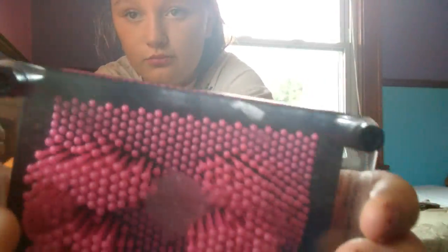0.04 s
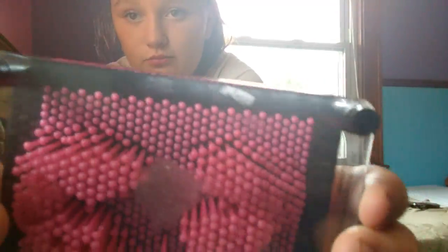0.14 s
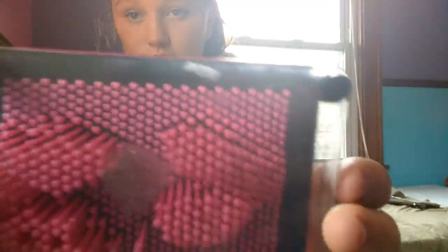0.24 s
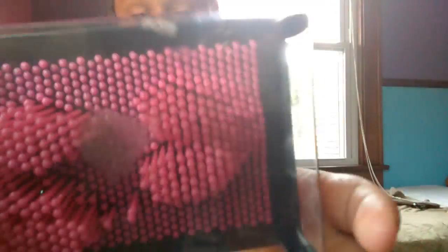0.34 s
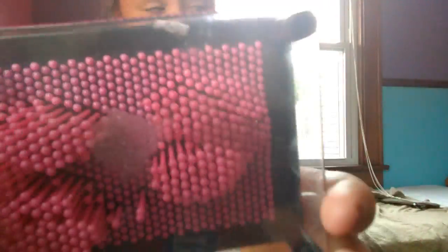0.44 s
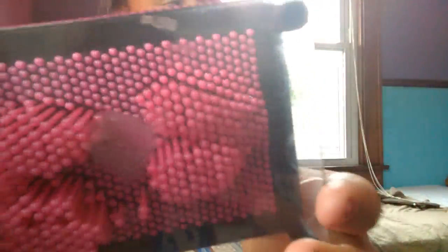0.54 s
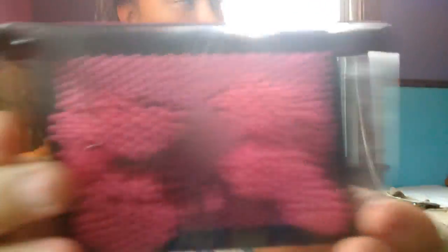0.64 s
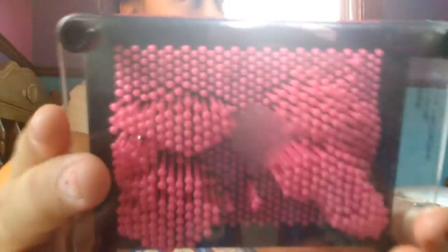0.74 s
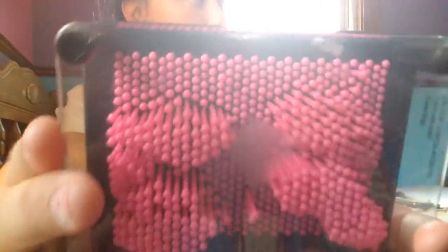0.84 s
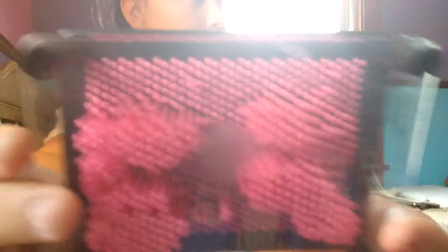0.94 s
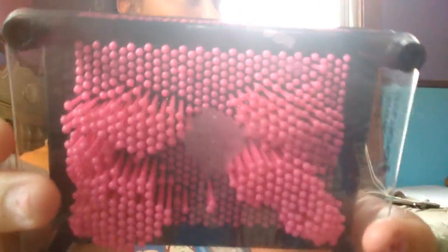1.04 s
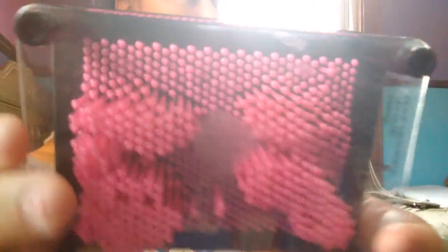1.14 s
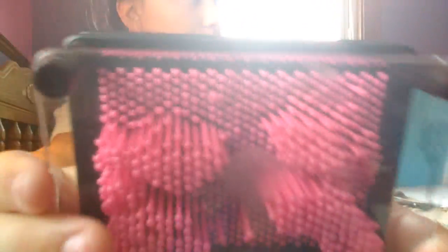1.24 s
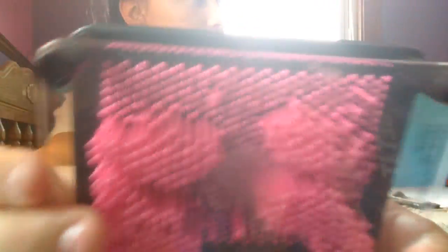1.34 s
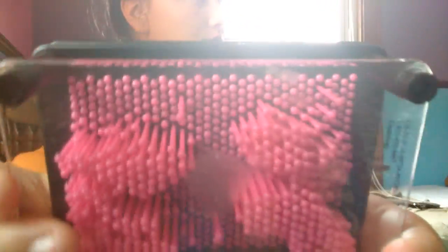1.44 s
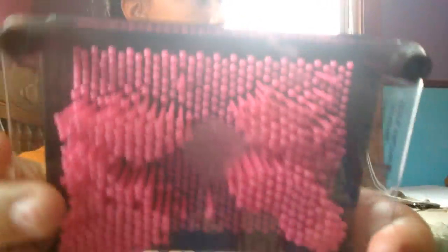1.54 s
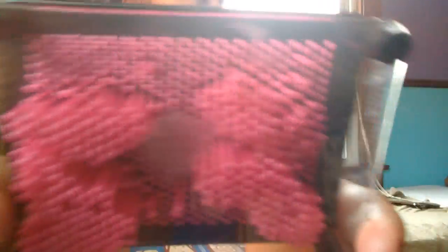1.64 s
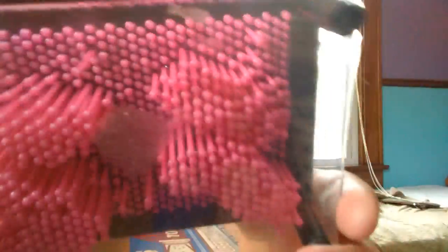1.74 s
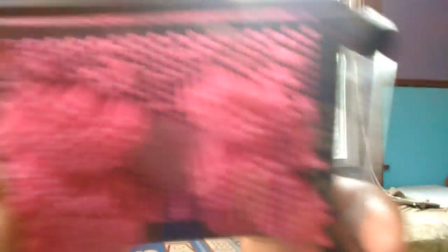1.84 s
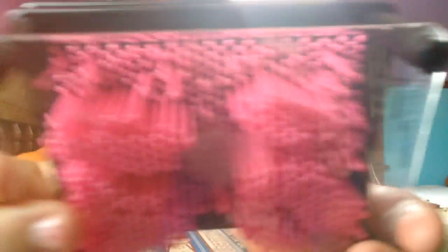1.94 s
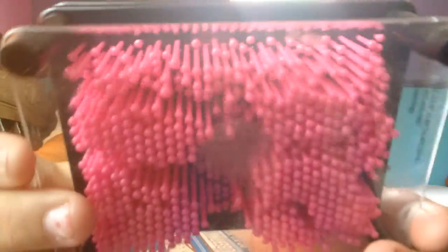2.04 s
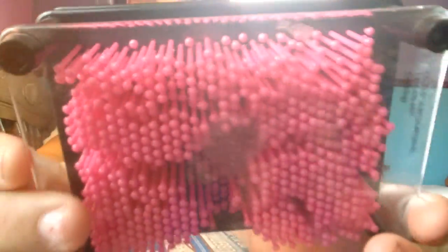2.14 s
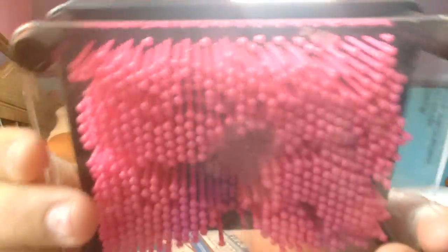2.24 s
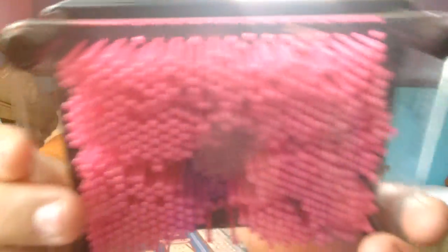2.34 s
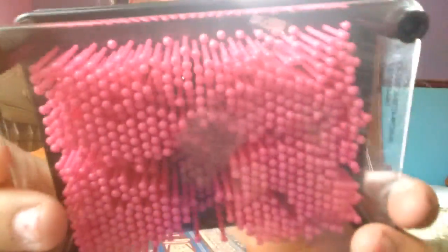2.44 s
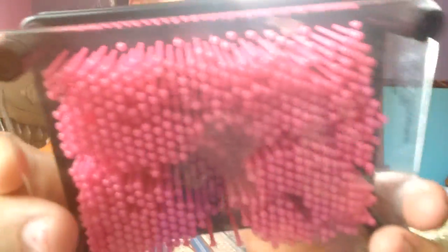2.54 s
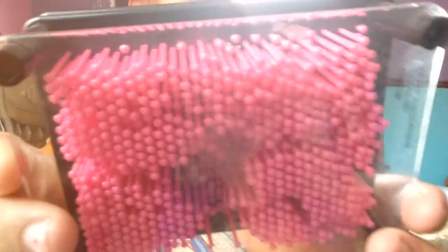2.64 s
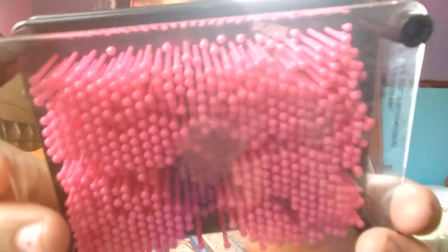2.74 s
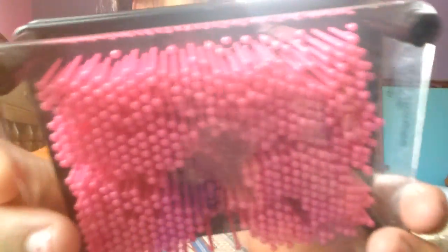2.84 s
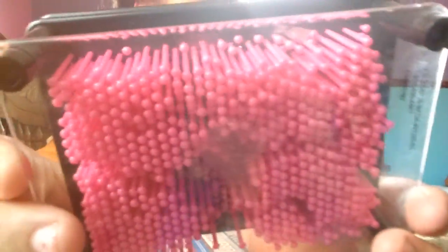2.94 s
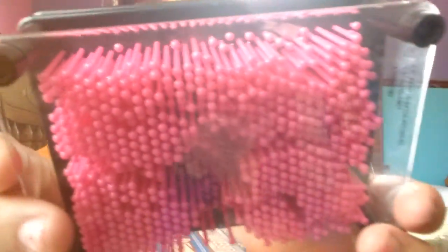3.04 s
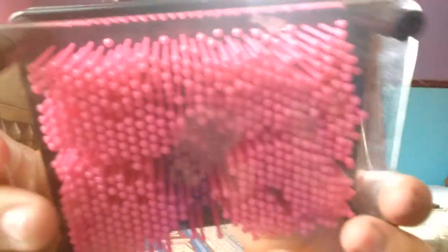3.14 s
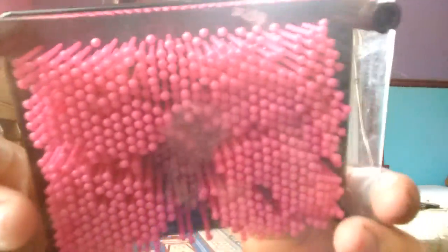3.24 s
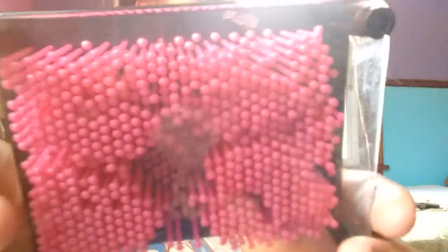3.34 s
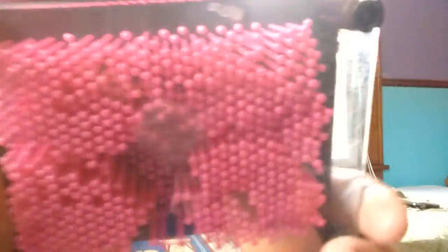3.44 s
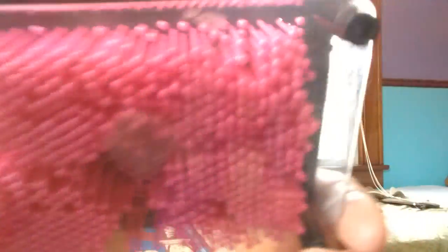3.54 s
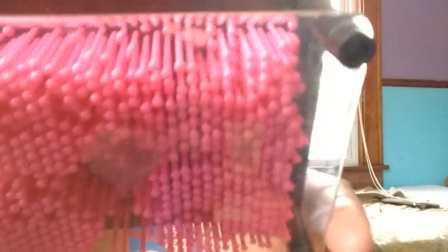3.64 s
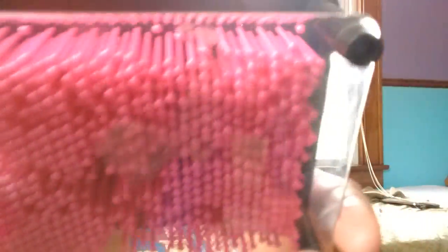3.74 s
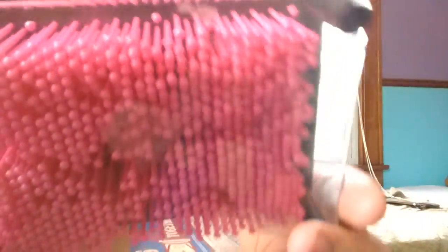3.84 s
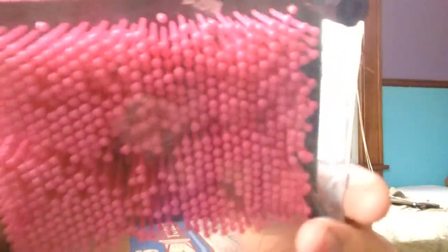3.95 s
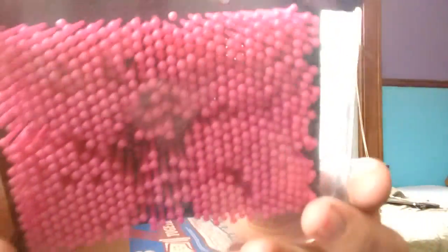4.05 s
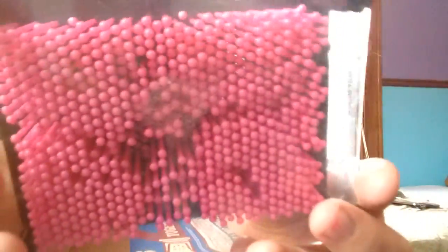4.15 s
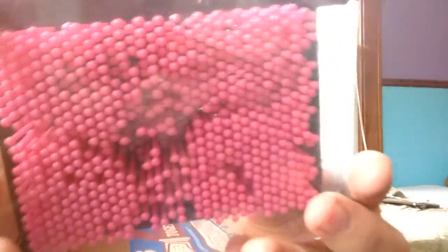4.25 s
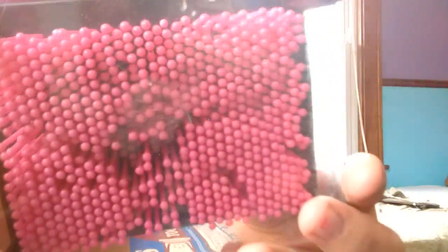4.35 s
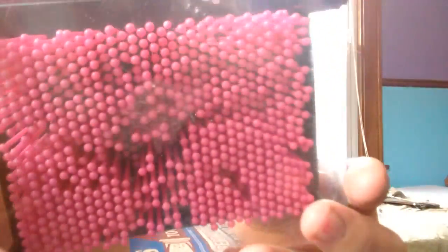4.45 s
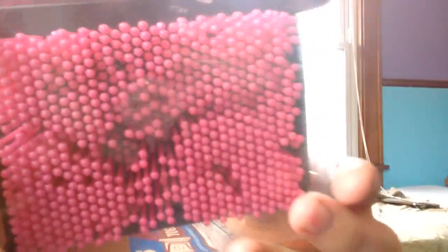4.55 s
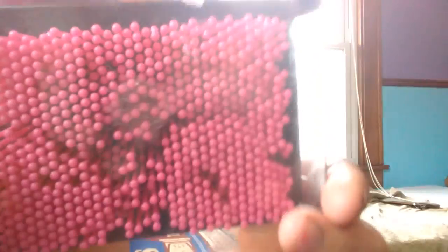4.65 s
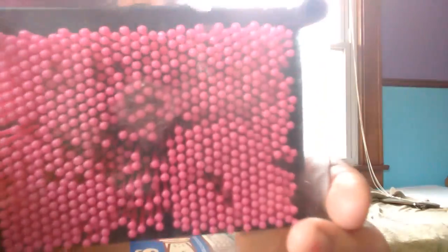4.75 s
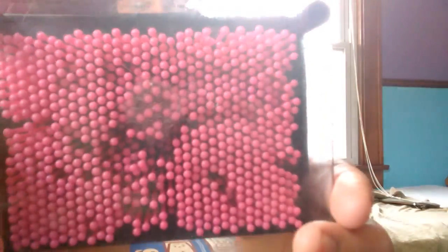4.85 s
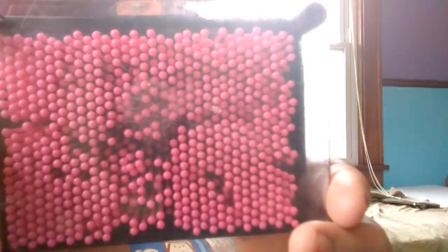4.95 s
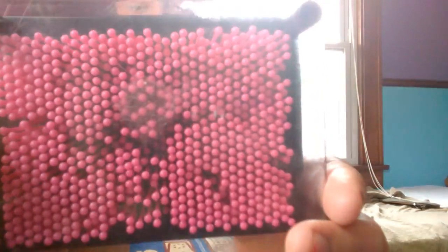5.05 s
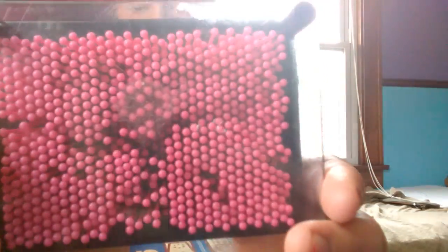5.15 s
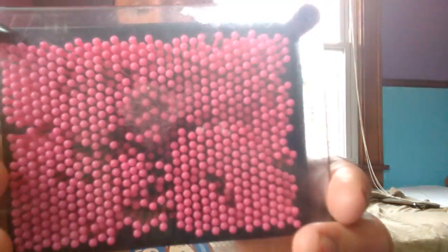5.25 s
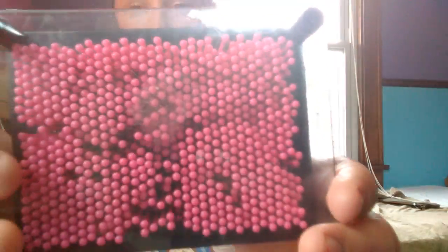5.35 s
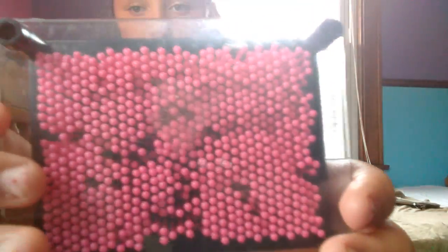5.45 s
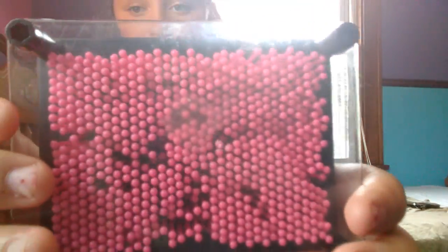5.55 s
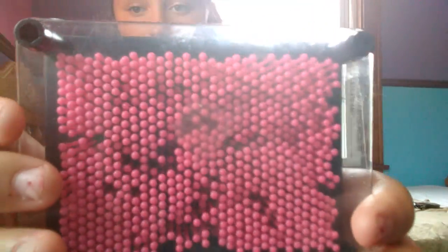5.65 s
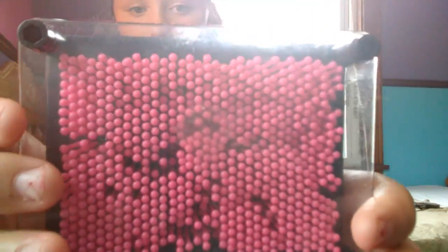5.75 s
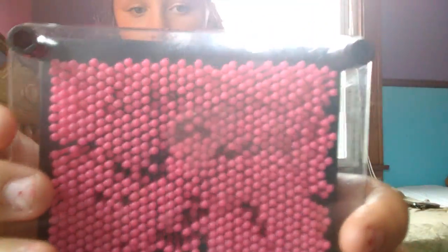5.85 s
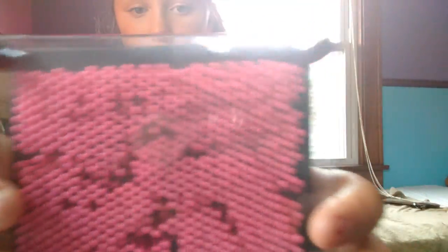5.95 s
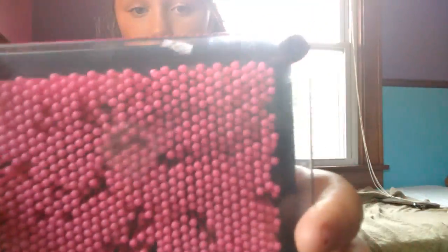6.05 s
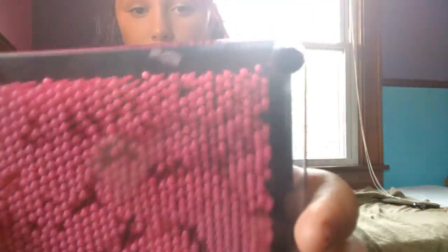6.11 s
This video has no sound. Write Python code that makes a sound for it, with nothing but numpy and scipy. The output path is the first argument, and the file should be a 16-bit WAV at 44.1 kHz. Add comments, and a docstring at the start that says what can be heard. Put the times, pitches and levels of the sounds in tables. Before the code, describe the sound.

Plastic pins in a pin art toy rustle and fall in irregular bursts of bright clicks as it is tilted in a small room.

```python
"""A small room, close up on a pin art toy: hundreds of loose plastic pins in a frame, tilted and pressed.
Pins drop one by one or land in whole patches against the clear front plate; between the falls they
rustle in their holes. Each hit is a bright pin ring near 8 kHz over a duller knock from the frame.
Fingers tap and rub the plate, hands rumble softly on the case, and faint room tone sits underneath."""
import sys
import numpy as np
from scipy import signal
from scipy.fft import rfft, irfft
from scipy.io import wavfile

SR = 44100
rng = np.random.default_rng(int(sys.argv[2]) if len(sys.argv) > 2 else 0)


def wav_out(sig):
    """Save sig, one row per channel (or a flat mono array), as 16-bit PCM at SR to the path in sys.argv[1]."""
    wavfile.write(sys.argv[1], SR, np.round(np.clip(np.atleast_2d(sig).T, -1, 1) * 32767).astype(np.int16))


N = 272538
TIME = np.arange(N) / SR

# Cue levels come before each layer's trim; spectra set tone colour only.
# single pins hitting their stop: t/s, level/dB
PIN_DROPS = [(0.0474, -11.5), (0.0644, -8), (0.9991, -33.5), (1.2961, -51.5), (1.4109, -41), (1.432, -36.5),
             (1.6677, -21.5), (1.8565, -26), (1.9032, -20.5), (1.945, -11.5), (2.0156, -3), (2.0335, -2),
             (2.0656, -8.5), (2.0715, -4), (2.1102, -5.5), (2.123, -2.5), (2.1603, -6), (2.381, -23),
             (2.421, -13), (2.467, -8.5), (2.8603, -19), (2.8918, -21.5), (2.918, -26.5), (3.1991, -34),
             (3.271, -32.5), (3.6599, -46), (3.6929, -33), (3.7108, -33.5), (3.746, -20.5), (3.7707, -13),
             (3.7831, -5), (3.8111, -2.5), (3.8842, -19.5), (3.892, -10), (3.933, -11), (3.9522, -19),
             (4.044, -28.5), (4.2035, -26.5), (5.7079, -33)]
# runs of stragglers behind the big falls: t/s, length/s, starting level/dB
STRAGGLER_RUNS = [(2.0092, 0.019, -6.5), (2.054, .035, -8.5), (2.154, 0.028, -5.5), (3.864, 0.017, -9.5)]
STRAGGLER_GAP_S, STRAGGLER_FADE_DB = .009, 8  # mean time between pins; fade over a whole run
# patches of pins landing together: t/s, length/s, level/dB
PATCH_FALLS = [(0.070, 0.015, -7), (0.701, 0.012, -4.5), (1.463, 0.012, -14.5), (1.988, 0.017, -7),
               (2.035, .013, -9), (2.127, .020, -9.5), (3.795, 0.01, -14.5), (3.82, 0.023, -13.5),
               (3.839, 0.022, -13.5), (4.136, 0.022, -22), (5.185, 0.023, -46), (5.533, .021, -37),
               (5.787, 0.014, -41.5), (6.041, 0.017, -16.5)]
# pins sliding as the toy tilts: t/s of fastest motion, length/s, level/dB
PIN_SLIDES = [(0.012, 0.18, -39.5), (0.31, 0.15, -48.5), (0.43, 0.052, -53), (0.522, 0.11, -44),
              (0.69, 0.077, -28.5), (1.26, 0.11, -62), (1.66, 0.17, -38), (1.925, 0.066, -40.5),
              (1.965, 0.081, -38), (2.44, 0.13, -42.5), (2.58, 0.055, -43.5), (3.31, 0.26, -55),
              (3.72, 0.26, -57), (4.24, 0.062, -36.5), (4.565, 0.067, -40.5), (4.69, 0.18, -61),
              (4.76, 0.042, -54.5), (4.868, .05, -54), (5.46, 0.16, -63), (5.58, 0.17, -51),
              (5.72, 0.13, -56), (5.81, .08, -44), (5.96, 0.076, -53.5), (6.025, 0.076, -46.5)]
# fingertips tapping the front plate: t/s, level/dB
FINGER_TAPS = [(0.364, -54), (0.5878, -51.5), (0.875, -58.5), (2.3085, -47), (2.3308, -41), (3.6857, -57),
               (3.711, -51.5), (5.195, -47), (5.487, -58), (5.537, -41), (5.552, -40.5), (5.6374, -51),
               (6.049, -31)]
# fingers dragging over the plate: t/s of firmest pressure, length/s, level/dB
FINGER_DRAGS = [(0.25, 0.7, -63), (1.66, 0.28, -60), (2.16, 0.16, -50.5), (2.52, .25, -66.5),
                (4.23, 0.29, -64.5), (5.33, 0.19, -78.5), (5.6, 0.66, -69), (6.1, 0.42, -65)]
# envelope of the hands shifting on the case: t/s, level/dB
GRIP_ENVELOPE = [(0.0, -63.5), (0.55, -65.5), (1.12, -87), (2.17, -65.5), (2.75, -76.5), (4.15, -71.5),
                 (4.99, -79.5), (6.18, -70.5)]
# low thuds under the heavy falls: t/s, level/dB
LOW_THUDS = [(0.078, -56.5), (0.704, -36.5), (1.995, -59)]
THUD_START_HZ, THUD_END_HZ, THUD_SWEEP_S, THUD_T60_S = 240, 45, 0.0076, 0.071

# spectra of a pin, the frame, the tapped plate, the rubbed plate, the grip and room tone: f/Hz, level/dB
PIN_TONE = [(1000, -41.5), (4000, -19.5), (6500, 2), (9500, 2), (12500, -8), (16000, -14)]
FRAME_TONE = [(60, -26), (250, -15.5), (500, -10), (1200, -9.5), (2000, -2.5), (3200, 2), (5500, 3),
              (9000, -20.5), (16000, -31)]
TAP_TONE = [(100, -14.5), (500, -9), (1500, -1), (3000, -0.5), (6000, -5.5), (16000, -31)]
DRAG_TONE = [(100, -10.5), (350, -1), (700, -6), (1100, -16), (3000, -16.5), (6000, -27.5), (16000, -47.5)]
GRIP_TONE = [(25, -15), (60, 0), (130, 2), (300, -4.5), (550, -9.5), (1000, -17.5), (3000, -25.5),
             (16000, -45)]
ROOM_TONE = [(15, -27.5), (25, -14.5), (53, -18), (123, -15), (1330, -41.5), (4370, -38.5), (6380, -40.5),
             (8360, -24), (9840, -37.5), (16000, -51)]
# resonances of a pin, the frame and the plate: f/Hz, width/Hz, boost/dB
PIN_MODES = [(7490, 400, 6), (8160, 622, 17.5), (8755, 450, 11), (9800, 200, 5.5), (11060, 240, 10),
             (14100, 430, 4)]
FRAME_MODES = [(560, 170, 2.1), (845, 250, 3), (1770, 240, 2.6), (2290, 110, 3), (3070, 180, 2.2),
               (5120, 220, 3)]
PLATE_MODES = [(520, 90, 7), (1110, 90, 4.5), (1630, 69, 10.5), (2140, 90, 5.5), (2840, 230, 8)]
FRAME_FOLLOWS = 0.87  # dB of frame knock per dB of pin ring: soft hits are duller

# reverb decay of the room: f/Hz, t60/s
ROOM_T60 = [(100, .5), (600, 0.5), (2000, 0.3257), (8000, 0.286), (16000, 0.31)]
# early reflections off desk and walls: delay/s, level/dB
REFLECTIONS = [(.0092, -22.5), (0.0125, -22.5), (.023, -23.5)]


def single_pins(frame, pin_db=11.5, frame_db=-3.0):
    """Sharp clicks: each falling pin rings and knocks the frame."""
    out = np.zeros(N)
    for s, level_db in list(PIN_DROPS) + stragglers():
        ring = strike(pin_ring(), chatter_t60=0.014, chatter_db=11.5)
        knock = strike(frame, chatter_t60=0.015, chatter_db=1.5)
        add(out, s, from_db(level_db + pin_db) * ring)
        add(out, s, from_db(FRAME_FOLLOWS * level_db + frame_db) * knock)
    return out


def pin_ring(spread=.018):
    """One pin's impulse response; no two ring at quite the same pitch."""
    return response(PIN_TONE, PIN_MODES, detune=1 + spread * rng.standard_normal())


def stragglers(count=16):
    """Late pins drop unevenly, softer as each run goes on. Returns cues: t/s, level/dB."""
    cues = []
    for start, length, level_db in STRAGGLER_RUNS:
        gaps = STRAGGLER_GAP_S * rng.uniform(.5, 1.5, count)
        ages = np.cumsum(gaps) - gaps[0]
        levels = level_db - STRAGGLER_FADE_DB * ages / length + 2 * rng.standard_normal(count)
        cues += [(start + age, db) for age, db in zip(ages, levels) if age < length]
    return cues


def pin_patches(frame, pin_db=-5.0, frame_db=-20.0, count=4):
    """A short crunch: dozens of pins land almost at once, loudest in the middle."""
    out = np.zeros(N)
    for s, length, level_db in PATCH_FALLS:
        size = int(length * SR)
        swell = np.sqrt(np.hanning(size))
        forces = [swell * grains(SR // 20, per_s=1500, spread_db=4.5)[:size] for _ in range(count)]
        rings = unit_energy(sum(signal.fftconvolve(force, pin_ring()) for force in forces))
        knocks = unit_energy(signal.fftconvolve(sum(forces), frame))
        rings *= from_db(level_db + pin_db)
        knocks *= from_db(FRAME_FOLLOWS * level_db + frame_db)
        add(out, s, np.sqrt(size) * (rings + knocks))
    return out


def sliding_pins(frame, pin_db=-3.0, frame_db=-26.0, ring_band_hz=(6800, 10000), count=4):
    """Rustle: pins catch and slip in their holes, too softly to stir much but their main ring."""
    motion = swells(PIN_SLIDES)
    rings = knocks = 0
    for _ in range(count):
        catches = grains(N, per_s=190, spread_db=11.0)
        tick = unit_energy(contact(chatter_t60=.006, chatter_db=1.5))
        ticks = motion * convolve(catches, tick)
        rings += convolve(ticks, pin_ring())
        knocks += convolve(ticks, frame)
    main_ring = bandpass(rings, ring_band_hz, order=1)
    return (from_db(pin_db) * main_ring + from_db(frame_db) * knocks) / np.sqrt(count)


def fingers(tap_db=17.5):
    """Fingertips stick and slip across the front plate, or tap it; both ring the same modes."""
    slips = swells(FINGER_DRAGS) * grains(N, per_s=700, spread_db=4.0)
    out = convolve(slips, response(DRAG_TONE, PLATE_MODES))
    plate = response(TAP_TONE, PLATE_MODES)
    for s, level_db in FINGER_TAPS:
        add(out, s, from_db(level_db + tap_db) * strike(plate, chatter_t60=.011, chatter_db=1.0))
    return out


def low_end(rub_db=-1.0):
    """Hands rub the case; a low thud sits under the heavy falls, swept quickly downward in pitch."""
    grip_db = np.interp(TIME, *np.transpose(GRIP_ENVELOPE))
    out = from_db(grip_db + rub_db) * convolve(rng.standard_normal(N), response(GRIP_TONE))
    t = np.arange(SR // 2) / SR
    hz = THUD_END_HZ + (THUD_START_HZ - THUD_END_HZ) * np.exp(-t / THUD_SWEEP_S)
    thud = np.sin(2 * np.pi * np.cumsum(hz) / SR) * from_db(-60 * t / THUD_T60_S)
    for s, level_db in LOW_THUDS:
        add(out, s, from_db(level_db) * thud)
    return out


def room_reverb(x, tail_db=-11.0, build_s=0.0042):
    """A few early reflections and a diffuse tail that dies sooner in the treble."""
    t = np.arange(SR // 2) / SR
    edges_hz = np.geomspace(60, 18000, 9)
    tail = 0
    for low, high in zip(edges_hz, edges_hz[1:]):
        band = bandpass(rng.standard_normal(len(t)), (low, high), order=2)
        tail += band * from_db(-60 * t / at_hz(ROOM_T60, np.sqrt(low * high)))
    fade_in = 1 - np.exp(-(t / build_s) ** 2)
    walls = from_db(tail_db) * unit_energy(tail * fade_in)
    for delay, level_db in REFLECTIONS:
        walls[int(delay * SR)] += from_db(level_db)
    return convolve(x, walls)


def room_tone(level_db=-80.5):
    """A faint, steady bed of low rumble and thin hiss."""
    return from_db(level_db) * convolve(rng.standard_normal(N), response(ROOM_TONE))


def contact(chatter_t60, chatter_db, size=600):
    """The force of a hit: a sharp transient, then a few milliseconds of chatter."""
    decay = from_db(-60 * np.arange(size) / SR / chatter_t60)
    force = from_db(chatter_db) * unit_energy(rng.standard_normal(size) * decay)
    force[0] += 1
    return force


def strike(body, chatter_t60, chatter_db):
    """One contact ringing a body, at unit energy."""
    return unit_energy(signal.fftconvolve(contact(chatter_t60, chatter_db), body))


def grains(size, per_s, spread_db):
    """Tiny contacts at random moments, of uneven strength and either sign; mean power 1."""
    strength = from_db(spread_db * np.clip(rng.standard_normal(size), -2, 2))
    sign = rng.choice([-1, 1], size)
    hits = rng.random(size) < per_s / SR
    return unit_energy(strength * sign * hits) * np.sqrt(size)


def swells(moves, rise_share=0.6, depth_db=19):
    """Gain envelope of moves that each build to a peak and die away, evenly in dB."""
    gain = np.zeros(N)
    for s, length, level_db in moves:
        phase = (TIME - s) / length
        from_peak = np.maximum(-phase / rise_share, phase / (1 - rise_share))
        gain += from_db(level_db - depth_db * from_peak)
    return gain


def response(tone, modes=(), detune=1, size=2048):
    """Impulse response of a body with this spectrum and these resonances."""
    hz = np.fft.rfftfreq(size, 1 / SR)
    peaks_db = sum(db / (1 + (2 * (hz - f * detune) / width) ** 2) for f, width, db in modes)
    cepstrum = irfft(np.log(from_db(at_hz(tone, hz) + peaks_db)))
    # fold to minimum phase for a tight attack
    cepstrum[1:size // 2] *= 2
    cepstrum[size // 2 + 1:] = 0
    return unit_energy(irfft(np.exp(rfft(cepstrum))))


def from_db(db):
    """Decibels to gain."""
    return 10 ** (np.asarray(db) / 20)


def unit_energy(x):
    """Scale so that the squares sum to 1."""
    return x / np.sqrt(np.sum(x ** 2) + 1e-20)


def at_hz(points, hz):
    """Read a table on a log-frequency axis."""
    known_hz, values = np.transpose(points)
    return np.interp(np.log(np.maximum(hz, 1)), np.log(known_hz), values)


def add(out, s, sound):
    """Mix a one-shot into out at time s."""
    start = max(int(s * SR), 0)
    out[start:start + len(sound)] += sound[:max(N - start, 0)]


def bandpass(x, band_hz, order):
    """Roll off both sides of a band."""
    return signal.sosfilt(signal.butter(order, band_hz, "band", fs=SR, output="sos"), x)


def convolve(x, ir):
    """Play x through an impulse response."""
    return signal.oaconvolve(x, ir)[:N]


def scene():
    """The mono mix: the toy up front, its reverb behind, room tone underneath."""
    frame = response(FRAME_TONE, FRAME_MODES)
    bed = room_tone()
    toy = pin_patches(frame) + sliding_pins(frame) + fingers() + low_end() + single_pins(frame)
    return (toy + room_reverb(toy) + bed)[None]


def record(dry):
    """Soft clipping rounds the loudest peaks; a steep low-pass takes off the very top."""
    cutoff_hz = 15900
    lowpass = signal.ellip(10, .1, 80, cutoff_hz, fs=SR, output="sos")
    return signal.sosfilt(lowpass, np.tanh(dry))


dry = scene()
out = record(dry)
wav_out(out)
```